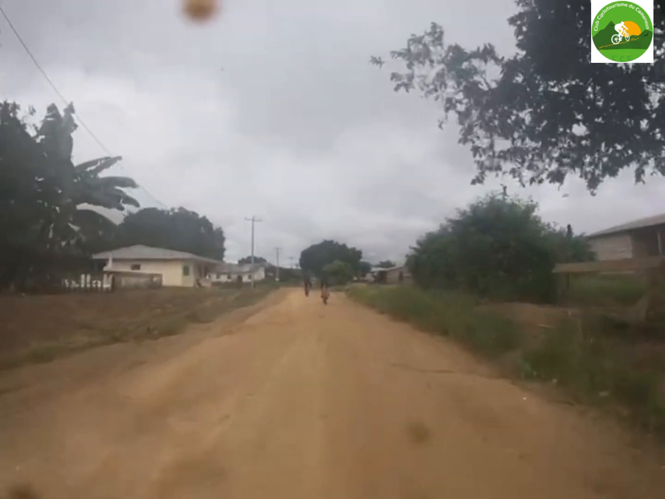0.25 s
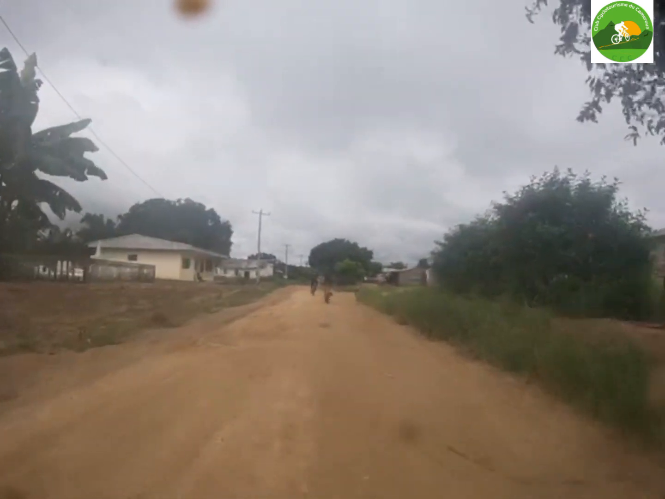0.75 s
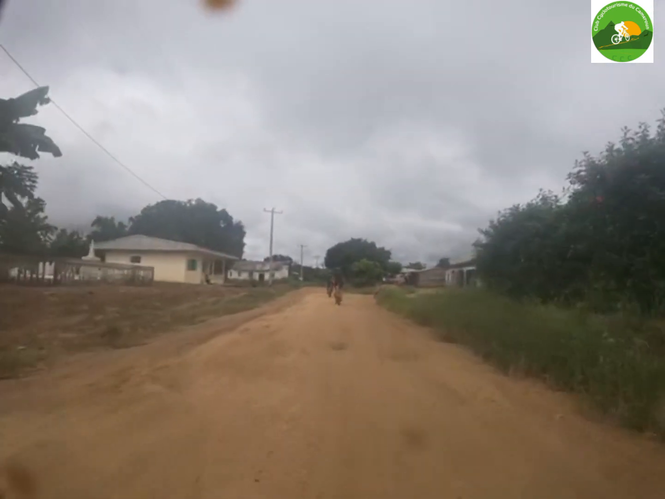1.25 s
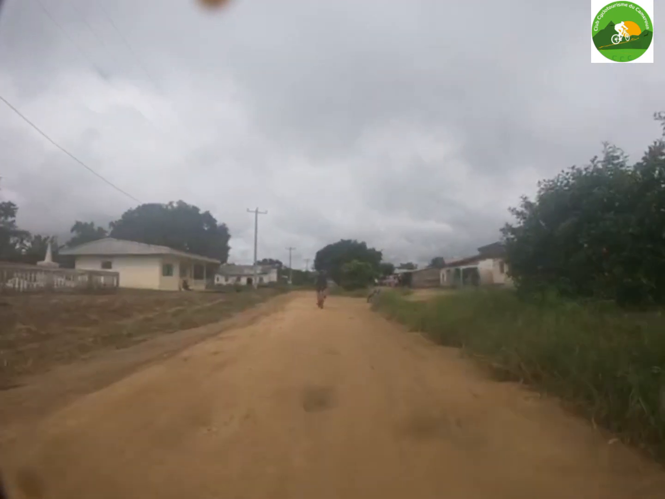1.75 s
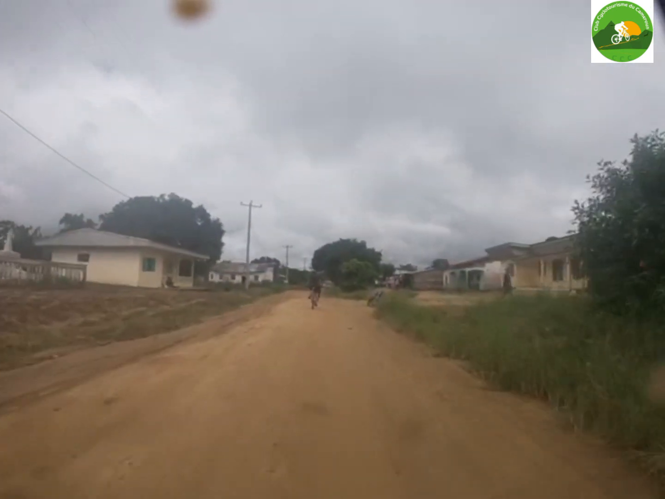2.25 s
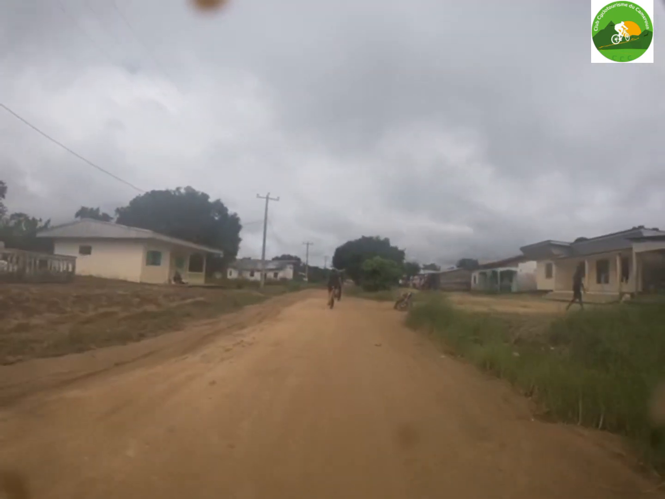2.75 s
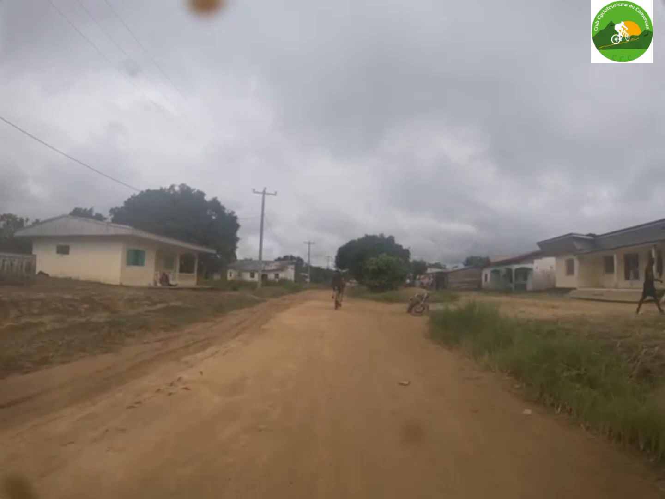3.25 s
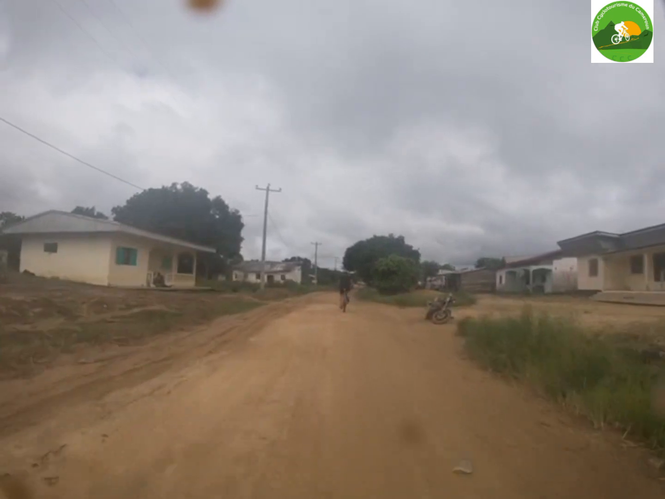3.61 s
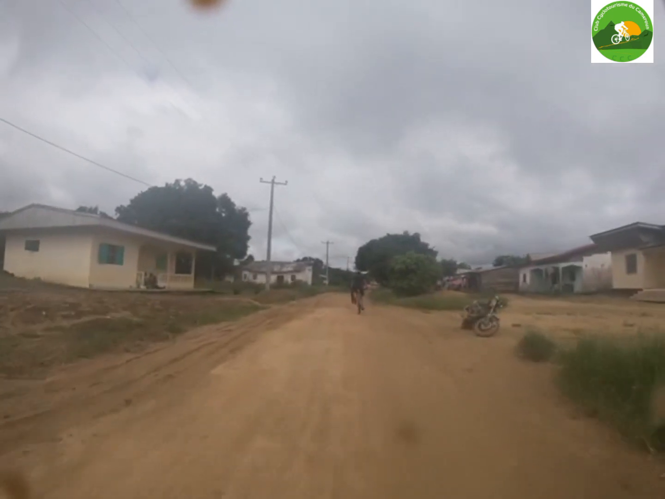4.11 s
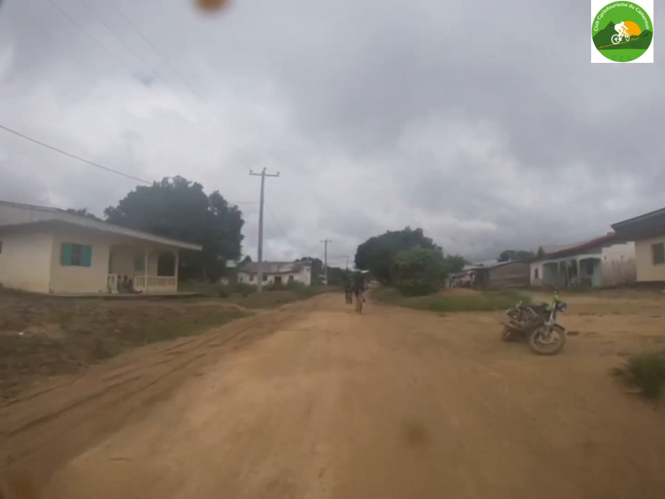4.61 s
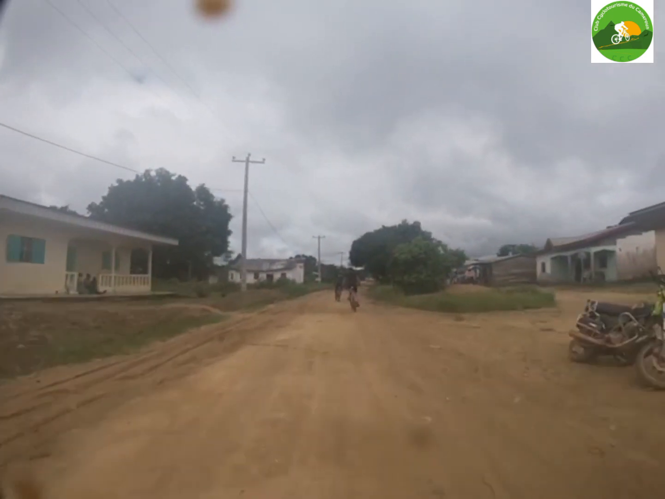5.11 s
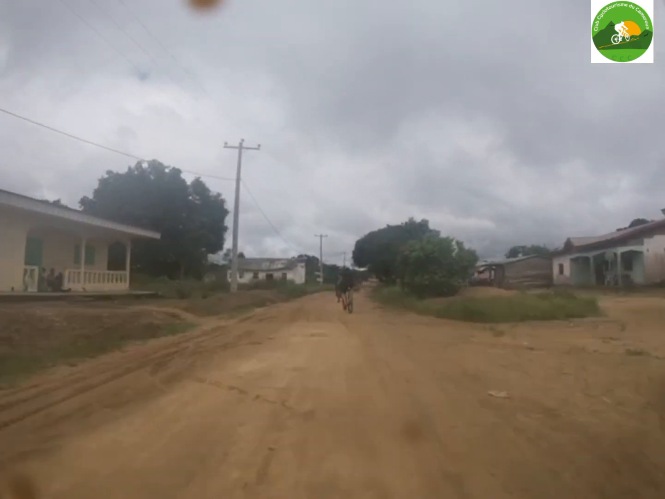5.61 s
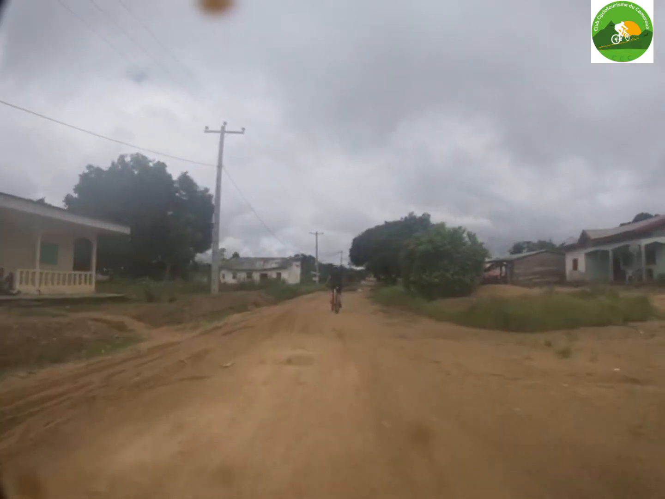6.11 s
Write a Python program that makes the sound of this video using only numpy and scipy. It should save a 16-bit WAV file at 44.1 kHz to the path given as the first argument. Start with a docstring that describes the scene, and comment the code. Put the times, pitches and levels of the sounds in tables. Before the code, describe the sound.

Irregular, hollow plastic knocks and clicks sound right at the microphone as an encased camera jolts on a bicycle outdoors. An early flurry includes one hard hit with a brief, thin, high ring. The knocks then space out, the tyres crunch softly through a sandier stretch, and a last cluster follows. The bicycle's low rumble, air pushing on the case and the rolling hiss stay quiet and muffled throughout.

```python
"""A camera in a closed plastic case knocks in its mount as a bicycle rides along a bumpy dirt road.
Each impact excites a sharp click, a hollow clack, a short ring of the mount and a low thump.
Beneath the knocks the frame rumbles, air buffets the case and the tyres hiss on sand, muffled by the case.
A thin, high ring at 4-5.5 kHz swells and fades around the hardest knock.
That knock trips the camera's limiter, which recovers slowly."""
import sys
import numpy as np
from scipy import signal
from scipy.fft import rfft, irfft
from scipy.io import wavfile
from scipy.ndimage import uniform_filter1d, minimum_filter1d

SR = 44100
rng = np.random.default_rng(int(sys.argv[2]) if len(sys.argv) > 2 else 0)


def unload_audio(sound):
    """Save the sound as a 16-bit wav file, at the path given as the first command line argument."""
    columns = np.transpose(np.atleast_2d(sound))
    # keep every value between -1 and 1, then stretch to whole-number steps
    steps = np.round(np.clip(columns, -1, 1) * 32767)
    wavfile.write(sys.argv[1], SR, steps.astype(np.int16))


N = 280639

# rough, smooth or sandy stretches of road: centre_s, half_length_s, extra_rumble_db, extra_sand_db
GROUND_STRETCHES = [(0.0, 0.13, -5.5, -2.5), (0.45, 0.14, 2, 3.5), (0.85, 0.36, -5, -4),
                    (2.25, 0.22, -0.5, -6.5), (2.843, 0.099, 7, 0), (3.03, 0.052, -7, -4.5),
                    (3.47, 0.1, -0.5, 4.5), (4.61, 0.065, 3.5, 6.5), (5.472, 0.35, 1.5, 10),
                    (6.168, 0.082, -7, 0.5)]
# spectra of the continuous noises: frequency_hz, relative_density_db
RUMBLE_SPECTRUM = [(20, -25), (105, -9.5), (155, 0), (205, -2), (270, -14), (500, -30), (2000, -69)]  # the shaking frame
BUFFET_SPECTRUM = [(10, -1.5), (25, 0), (60, -4), (105, -15), (250, -38), (1000, -71)]  # air pushing on the case
SAND_SPECTRUM = [(100, -16), (280, 2.5), (450, 0.5), (800, -5), (1300, -17), (3000, -31.5), (8000, -52)]  # sand being crushed
HISS_SPECTRUM = [(200, -13), (850, -4.5), (1000, -3.5), (1110, -0.5), (1230, -1.5), (1450, 0), (1580, -1.5),
                 (1750, -1.5), (2100, -4), (3200, -6.5), (4200, -13), (5200, -21), (7000, -36),
                 (12500, -52.5)]  # the rolling tyres
GRIT_SPECTRUM = [(2000, -26), (5000, -3.5), (7000, -5), (10500, -6), (12500, -16)]  # fine grit thrown up
# faint resonances of the bicycle that colour the hiss: centre_hz, width_hz, level_db
BICYCLE_MODES = [(1054, 70, -1), (1583, 45, 0), (3190, 64, -7)]

# the camera hits its stop: start_s, strength_db, relative_mount_ring_db
KNOCK_EVENTS = [(0.3434, -18.5, -1.5), (0.4315, -21, -10.5), (0.5596, -20.5, -10.5), (0.6001, -22.5, -26),
                (0.785, -22, -13), (0.992, -19, -6), (1.0842, -23.5, -10), (1.2164, -21.5, -11.5),
                (1.3401, -21, -13.5), (1.437, -21.5, -10), (1.4738, -4, -9), (1.5438, -23, -10.5),
                (1.6428, -20, -8.5), (1.711, -25.5, -9), (1.827, -23.5, -7), (1.9624, -21, -15),
                (1.9971, -28, -9), (2.3376, -20.5, -1.5), (2.666, -23, -2), (2.9597, -22.7, 1.5),
                (3.5233, -21, -1), (3.5394, -27.5, -0.5), (3.8217, -21, -1.5), (4.1511, -20.5, -2),
                (4.6292, -19.5, -1), (5.708, -19.5, -1.5), (5.7894, -22.5, 0.5), (6.0115, -20.5, 0),
                (6.051, -20, -1), (6.0993, -24.5, -10), (6.3108, -23, 2.5)]
# soft jolts that stop short of a click: start_s, strength_db, relative_mount_ring_db
THUD_EVENTS = [(0.3756, -45, -2), (2.754, -47.5, 2.5), (2.823, -50.5, 12), (2.877, -39, -3),
               (2.8877, -33.5, -10), (4.6607, -30, -7), (5.7343, -28.5, -6), (6.122, -29, -30)]
# the loose joint ticks around a knock or thud: start_s, strength_db
TICK_EVENTS = [(0.3751, -44.5), (0.3897, -46), (0.59895, -22), (1.4443, -36.5), (1.54, -41),
               (1.5501, -38.5), (2.8767, -43.5), (4.6378, -32)]
# spectra of the four parts of a knock, low to high: frequency_hz, relative_level_db
THUMP_SPECTRUM = [(10, -4.5), (32, 2.5), (60, -1), (100, -3), (210, -11.5), (260, -19), (1000, -52.5),
                  (4000, -100)]
MOUNT_SPECTRUM = [(20, -63), (80, -36), (120, -18), (152, 0.5), (180, -1.5), (215, -2), (255, -15),
                  (500, -48), (2000, -88.5)]
CLACK_SPECTRUM = [(20, -52.5), (120, -33), (300, 0.5), (580, 2), (800, -3), (1050, -9), (2000, -42.5),
                  (6000, -79.5)]
CLICK_SPECTRUM = [(50, -47), (300, -15), (950, -7.5), (1250, 1.5), (1600, 4), (2000, -0.5), (2500, -2.5),
                  (3300, -6), (4000, -13), (5000, -23), (6500, -38.5), (10000, -55.5), (12000, -63)]

# decaying tones of the thin, high ring: pitch_hz, relative_level_db, t60_s
HIGH_RING_TONES = [(4130, -3.5, 0.036), (4080, 3, .04), (4050, -3, 0.032), (4740, -2.5, 0.06),
                   (5210, -8.5, .085), (5450, -6, 0.024)]
# band of noise that drives those tones: frequency_hz, relative_density_db
RING_DRIVE_SPECTRUM = [(3500, -31), (3950, 2), (5600, -0.5), (6000, -31.5)]


def undb(db):
    """Amplitude grows tenfold for every 20 dB."""
    return 10 ** (np.asarray(db) / 20)


def spectral_gain(spectrum, hz):
    """A spectral envelope: level runs in straight lines between points on a log frequency axis."""
    points_hz, db = np.transpose(spectrum)
    return undb(np.interp(np.log(hz + 1e-9), np.log(points_hz), db))


def noise(spectrum, envelope=spectral_gain):
    """Filtered white noise takes on the spectral envelope of its filter; rms 1."""
    gain = envelope(spectrum, np.fft.rfftfreq(N, 1 / SR))
    x = irfft(rfft(rng.standard_normal(N)) * gain, N)
    return x / x.std()


def resonant_gain(modes, hz):
    """Each resonance passes a bell-shaped band about its centre frequency."""
    return sum(undb(db) / (1 + (2 * (hz - centre) / width) ** 2) for centre, width, db in modes)


def wander(rate_hz):
    """Random modulation: held values, smoothed twice, with standard deviation 1."""
    hold = max(int(SR / rate_hz), 2)
    steps = np.repeat(rng.standard_normal(N // hold + 1), hold)
    x = uniform_filter1d(uniform_filter1d(steps, hold), hold)[:N]
    return x / x.std()


def ground(times):
    """Excitation swells and fades as the wheels cross each stretch: extra rumble and sand, in dB."""
    centre_s, half_length_s, rumble_db, sand_db = np.transpose(GROUND_STRETCHES)
    crossing = np.exp(-.5 * ((times[:, None] - centre_s) / half_length_s) ** 2)
    return crossing @ rumble_db, crossing @ sand_db


def frame_rumble(rough_db, base_db=-59, jolt_db=3.5):
    """Forced vibration: uneven ground shakes the frame, harder where it is rough."""
    return undb(base_db + rough_db + jolt_db * wander(18)) * noise(RUMBLE_SPECTRUM)


def air_buffet(rough_db, base_db=-56.5, gust_db=2, rough_share=0.29):
    """Fluctuating air pressure on the case makes a deep, gusting noise."""
    return undb(base_db + rough_share * rough_db + gust_db * wander(6.8)) * noise(BUFFET_SPECTRUM)


def sand_crush(sand_db, base_db=-70, patchy_db=2):
    """Countless grain contacts merge into noise as the tyres crush patches of sand."""
    return undb(base_db + sand_db + patchy_db * wander(40)) * noise(SAND_SPECTRUM)


def tyre_hiss(sand_db, hiss_db=-68, modes_db=-78, grit_db=-95.5):
    """Rolling noise, coloured by resonance; deeper sand adds a little hiss and much more fine grit."""
    flicker_db = 1.34 * wander(120)
    hiss = undb(hiss_db) * noise(HISS_SPECTRUM)
    ringing = undb(modes_db) * noise(BICYCLE_MODES, resonant_gain)
    grit = undb(grit_db + 0.65 * sand_db + flicker_db) * noise(GRIT_SPECTRUM)
    return undb(0.06 * sand_db + flicker_db) * (hiss + ringing) + grit


def impulses(times, db):
    """A brief impact acts as a single impulse."""
    x = np.zeros(N)
    np.add.at(x, np.clip(np.round(times * SR).astype(int), 0, N - 1), undb(db))
    return x


def strike(hits, spectrum, spring_hz=185, spring_q=0.65, leak_hz=22, heavy_hz=350, stiff_hz=3000):
    """Each hit excites the case's impulse response; the springy mount delays the lows behind the highs."""
    size = 8192
    hz = np.fft.rfftfreq(size, 1 / SR)
    s = 1j * hz
    spring = 1 + s / (spring_hz * spring_q) + (s / spring_hz) ** 2
    lag = 2 * np.angle(spring) + np.angle((1 + s / heavy_hz) / (1 + s / stiff_hz))
    lead = np.arctan2(leak_hz, hz)  # slow pressure leaks out of the case
    transfer = -spectral_gain(spectrum, hz) * np.exp(1j * (lead - lag))
    response = np.fft.fftshift(irfft(transfer))
    response /= np.abs(response).max()
    return signal.fftconvolve(hits, response)[size // 2:][:N]


def shiver(hits, spectrum, t60_s):
    """Damping makes the irregular shaking after each hit decay exponentially."""
    decay = np.exp(-np.log(1000) / (t60_s * SR))
    return signal.lfilter([1], [1, -decay], hits) * noise(spectrum)


def mount_thumps(thump_db=-0.27, shake_db=-22):
    """Free vibration: after each knock or thud the mount thumps, rings and briefly shakes on."""
    times, strength_db, ring_db = np.transpose(KNOCK_EVENTS + THUD_EVENTS)
    thump = undb(thump_db) * strike(impulses(times, strength_db), THUMP_SPECTRUM)
    ring_hits = impulses(times, strength_db + ring_db)
    shake = undb(shake_db) * shiver(ring_hits, MOUNT_SPECTRUM, t60_s=0.081)
    return thump + strike(ring_hits, MOUNT_SPECTRUM) + shake


def case_snaps(clack_db=-7, click_db=-1.9, tick_clack_db=-3, chatter_db=-42, usual_db=-20):
    """Hard contact excites high frequencies: the case clacks and clicks, and the joint chatters."""
    times, strength_db, ring_db = np.transpose(KNOCK_EVENTS)
    _, sand_db = ground(times)
    snap_db = strength_db + 0.23 * (strength_db - usual_db)  # harder knocks are brighter
    hollow_db = 0.25 * ring_db + 0.73 * sand_db  # hollower when the mount rings and on soft sand
    ticks = impulses(*np.transpose(TICK_EVENTS))
    clacks = impulses(times, snap_db + clack_db + hollow_db) + undb(tick_clack_db) * ticks
    clicks = impulses(times, snap_db + click_db) + ticks
    chatter = undb(chatter_db) * shiver(clicks, CLICK_SPECTRUM, t60_s=0.066)
    return strike(clacks, CLACK_SPECTRUM) + strike(clicks, CLICK_SPECTRUM) + chatter


def high_ring(centre_s=1.477, half_width_s=0.01, peak_db=-41.5, sizzle_db=-74):
    """Noise-driven resonance: a thin ring at 4-5.5 kHz swells and fades around the hardest knock."""
    t = np.arange(SR // 4) / SR
    tones = sum(undb(db - 60 * t / t60) * np.sin(2 * np.pi * hz * t) for hz, db, t60 in HIGH_RING_TONES)
    swell = np.exp(-.5 * ((np.arange(N) / SR - centre_s) / half_width_s) ** 2)
    ring = signal.fftconvolve(swell * noise(RING_DRIVE_SPECTRUM), tones)[:N]
    sizzle = undb(sizzle_db) * swell * noise(GRIT_SPECTRUM)
    return undb(peak_db) * ring / np.abs(ring).max() + sizzle


def limiter(x, ceiling_db=-4.5, attack_s=0.0016, recovery_db_per_s=3):
    """Peak limiting: gain drops just ahead of a peak over the ceiling, then climbs back steadily."""
    attack = max(int(attack_s * SR), 2)
    level_db = 20 * np.log10(np.abs(x).max(axis=0) + 1e-9)
    allowed_db = minimum_filter1d(np.minimum(ceiling_db - level_db, 0), 2 * attack)
    climb_db = recovery_db_per_s * np.arange(N) / SR
    gain_db = np.minimum.accumulate(allowed_db - climb_db) + climb_db
    return x * undb(uniform_filter1d(gain_db, attack))


def scene():
    """Superposition: the impacts and the rolling noises add in one channel."""
    rough_db, sand_db = ground(np.arange(N) / SR)
    impacts = mount_thumps() + case_snaps() + high_ring()
    rolling = frame_rumble(rough_db) + air_buffet(rough_db) + sand_crush(sand_db) + tyre_hiss(sand_db)
    return (impacts + rolling)[None]


def record(dry, cutoff_hz=12000):
    """The camera limits the loudest peak, and a steep low-pass filter bounds its bandwidth."""
    lowpass = signal.ellip(8, .2, 70, cutoff_hz, fs=SR, output="sos")
    return signal.sosfilt(lowpass, limiter(dry))


dry = scene()
out = record(dry)
unload_audio(out)
```